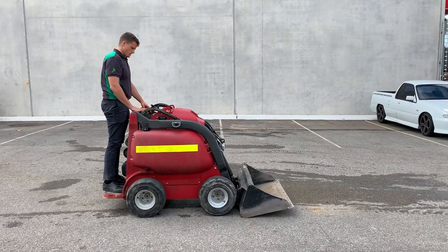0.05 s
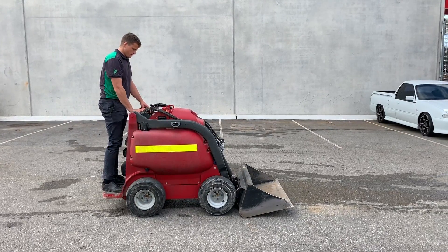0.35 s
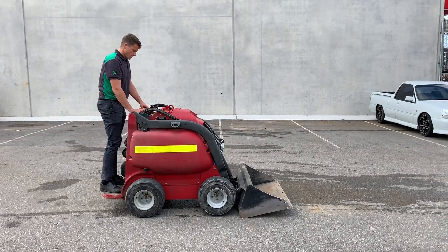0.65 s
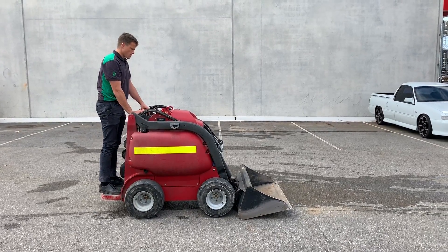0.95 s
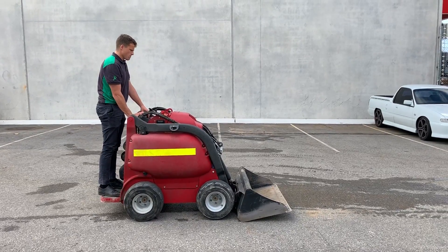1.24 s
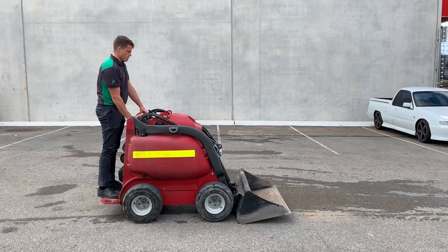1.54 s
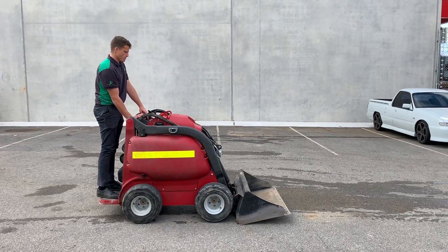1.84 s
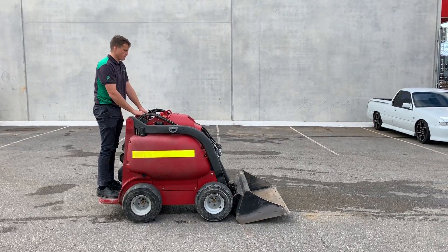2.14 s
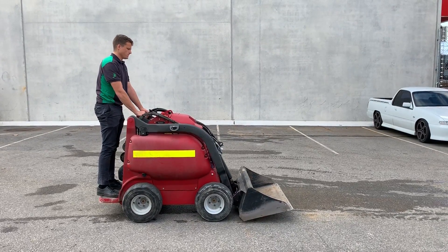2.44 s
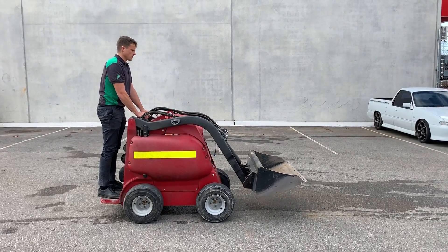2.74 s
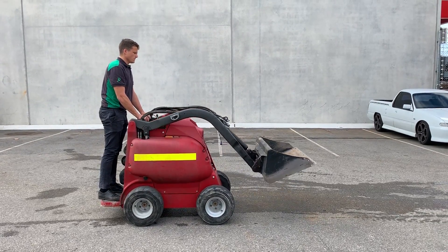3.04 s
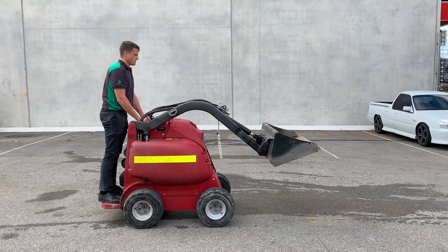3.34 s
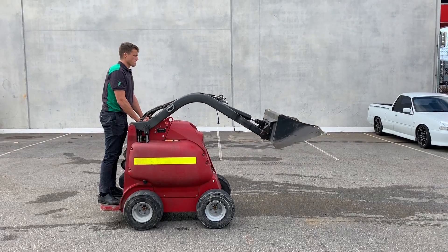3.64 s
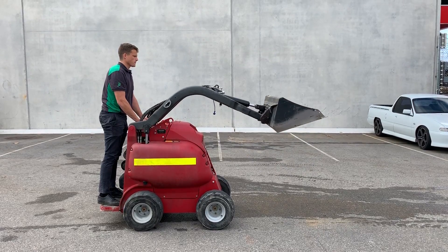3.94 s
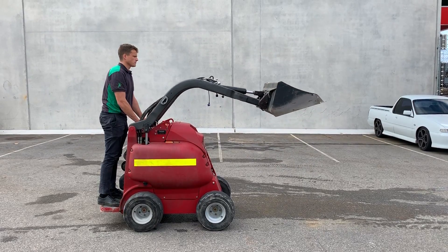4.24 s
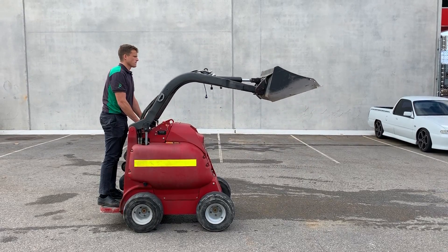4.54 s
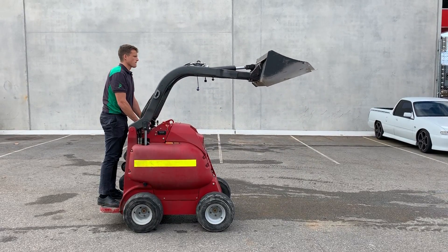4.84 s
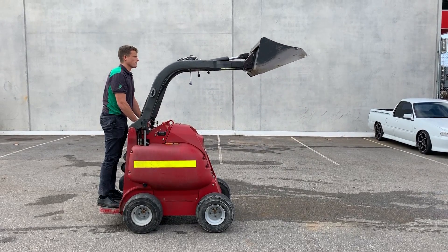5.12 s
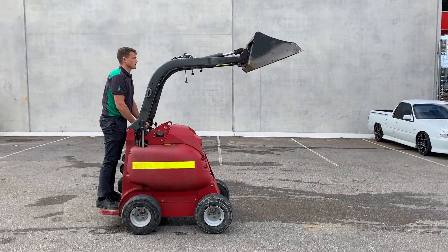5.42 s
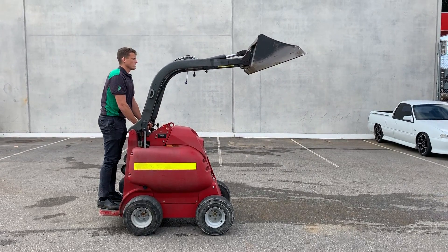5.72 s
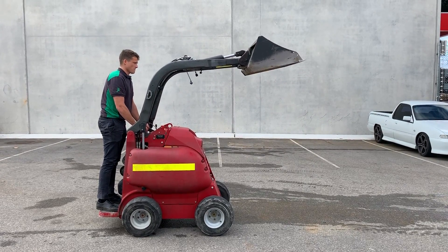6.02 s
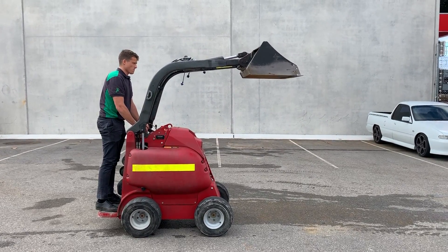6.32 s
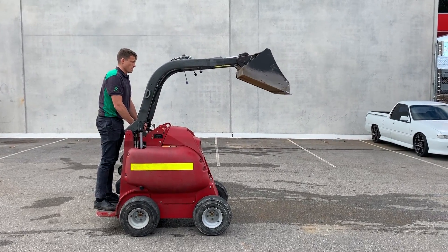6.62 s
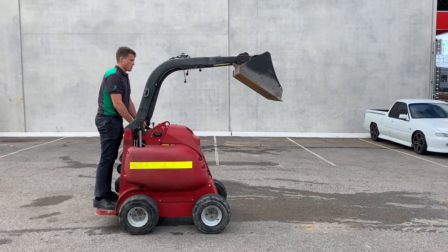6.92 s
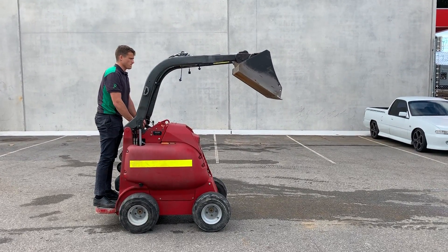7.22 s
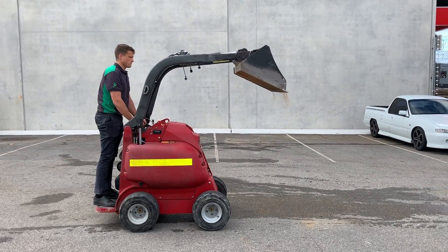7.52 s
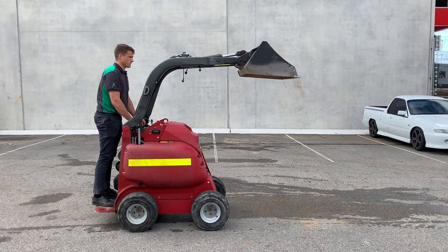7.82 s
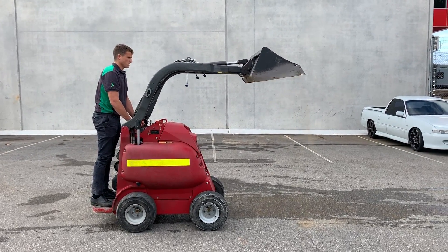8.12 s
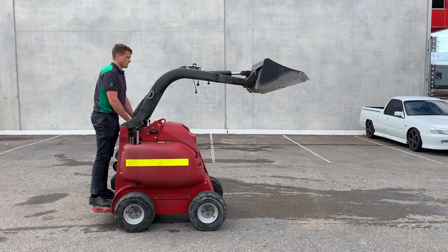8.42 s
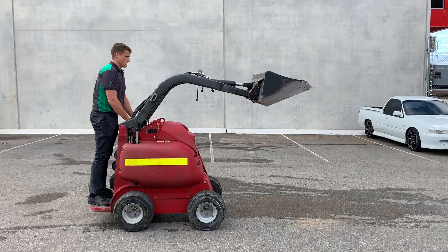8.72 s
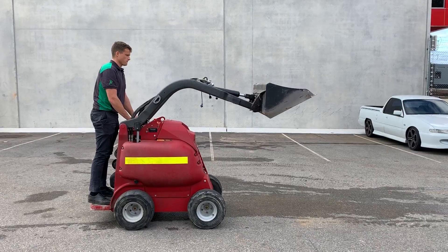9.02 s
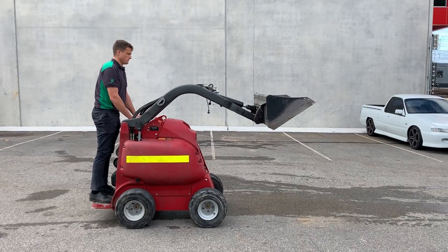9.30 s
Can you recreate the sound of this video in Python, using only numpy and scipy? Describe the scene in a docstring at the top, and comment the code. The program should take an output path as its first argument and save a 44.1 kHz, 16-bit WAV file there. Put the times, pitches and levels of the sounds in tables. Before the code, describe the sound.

A small diesel loader idles, revs up and runs steadily, with a faint hydraulic hum and thin hiss as its arm moves.

```python
"""A three-cylinder diesel mini loader idles in an open car park, its slack linkage clanking. At 0.5 s it is
throttled up and labours to its governed speed: the exhaust drones, the fan hums, each cycle thumps the
chassis and rattles a panel, injectors and valves clatter. From 2.5 s the pump hums and oil hisses through
the control valve as the arm lifts; near 5.5 s it meets its stop and the engine labours again.
The bucket tips at 6 s and curls back, and from 7.6 s the arm sinks with a thin hiss."""
import sys
import numpy as np
from scipy import signal
from scipy.fft import rfft, irfft
from scipy.io import wavfile
from scipy.ndimage import uniform_filter1d

SR = 44100
rng = np.random.default_rng(int(sys.argv[2]) if len(sys.argv) > 2 else 0)


def waveform_to_disk(signal):
    """Save audio, clipped to [-1, 1], as 16-bit WAV at the path in sys.argv[1]."""
    frames = np.transpose(np.atleast_2d(signal))
    scaled = np.clip(frames, -1, 1) * 32767
    samples = np.round(scaled).astype(np.int16)
    wavfile.write(sys.argv[1], SR, samples)


N = 421596

WORKING_HZ, IDLE_SETTING_HZ, FULL_SETTING_HZ = 25, 10.9, 25.96  # four-stroke cycles per second
THROTTLE_S, HARSH_UNTIL_S, SETTLE_S = 0.51, 1.8, 2.8
DROOP_HZ, HALF_FUEL = 1.18, 0.56
LUG_HZ, LUG_RANGE_HZ = 1.27, .5  # the engine labours when pulled this far under its setting
# The rev curve: (t/s, cycle rate f/Hz)
REVS = [(0.0, 8.172), (0.19, 9.65), (0.56, 9.715), (1.03, 15.752), (1.76, 23.826), (2.15, 25.664),
        (2.4, 25.536), (2.63, 24.95), (2.88, 24.978), (5.49, 25.013), (5.7, 23.924), (5.98, 25.653),
        (6.35, 25.032), (7.16, 24.962), (7.43, 25.487), (7.8, 24.439), (8.83, 24.781), (9.56, 24.64)]

def crankshaft():
    """Cycle rate and engine state; the governor feeds more fuel the further speed lags its setting."""
    t = np.arange(N) / SR
    hz, = curves(REVS)
    setting_hz = np.where(t < THROTTLE_S, IDLE_SETTING_HZ, FULL_SETTING_HZ)
    short_hz = np.maximum(setting_hz - hz, 0)
    demand = np.tanh(short_hz / DROOP_HZ)
    lug = np.clip((short_hz - LUG_HZ) / LUG_RANGE_HZ, 0, 1)
    fuel, labour = uniform_filter1d([demand, lug], size=SR // 8)  # the fuel rack takes a moment
    harsh = np.exp(-np.maximum(t - HARSH_UNTIL_S, 0) / SETTLE_S)
    return hz, np.array([np.log2(hz / WORKING_HZ), fuel - HALF_FUEL, harsh, labour])


def ride(fader, state):
    """Ride a fader in dB: base level, then dB per octave of speed, unit of fuel, harshness and labour."""
    return fader[0] + np.dot(fader[1:], state)


WAVER_DB, RAGGED_DB = .4, 1.4  # wobble of the drone: always, and added while labouring
FRAME_ORDER = 10
# The arm's travel: (t/s, height 0-1)
ARM_HEIGHT = [(2.55, 0), (5.3, 0.8), (7.7, 1), (9.56, 0.4)]
# Swells and dips that an order sweeps through: (f/Hz, width/Hz, level/dB)
STANDING_WAVES = [(70.6, 2.1, -8), (144.8, 5.5, 4), (186.3, 6.4, 13), (682, 11, 8)]
# Drone partials: (order, level/dB, then dB per unit of each: octave of speed, fuel, harshness,
# labour, oil pressure, arm height)
DRONE_ORDERS = [(3, -19, 17, -2.5, 4.5, 1, -1, 0), (6, -18.5, 4.5, 5.5, 2.5, 2, 0.5, -0.5),
                (7, -35.5, 18, 21, -2, -2.5, -11, -8), (8, -40.5, 6, -7.5, 21.5, 4, -14.5, 16.5),
                (9, -25.5, 2, -8, -2, 8, -13, 3.5), (10, -23, 23, 4.5, 7, -4.5, 2, 4.5),
                (12, -41.5, -13, -7.5, 1, 1, 8, -4), (28, -41, 10, 6, -7, -3, 1, 1)]

def exhaust(cycles, hz, state, pressure, frame_db):
    """The exhaust drones on harmonics of the engine cycle, turning ragged as the engine labours."""
    height, = curves(ARM_HEIGHT)
    controls = np.vstack([state, pressure, height])
    wobble_db = WAVER_DB + RAGGED_DB * state[-1]
    since_thump = cycles - THUMPS[0][0]
    drone = 0
    for order, *fader in DRONE_ORDERS:
        swell_db = sum(db * np.exp(-((order * hz - centre) / width) ** 2)
                       for centre, width, db in STANDING_WAVES)
        level_db = ride(fader, controls) + swell_db + frame_db * (order == FRAME_ORDER)
        drone += undb(level_db + wobble_db * walk(20)) * np.cos(2 * np.pi * order * since_thump)
    return drone


# Blows on the chassis: (place in the cycle 0-1, relative level/dB)
THUMPS = [(.6, -5.5), (.2, -9)]
# Hollow tones of chassis and muffler: (f/Hz, width/Hz, relative level/dB)
CHASSIS_MODES = [(115, 15, -17), (183, 24.7, 0.5), (216, 40, -4), (263.5, 19.3, 4.5), (298, 7.3, -2.5),
                 (346, 20, -5.5), (406, 66, -11.5)]
# The muffler's dark tone: (f/Hz, level/dB)
MUFFLER_EQ = [(50, -16), (110, -2), (160, -2), (350, -1), (430, -9.5), (550, -19.5), (1200, -60)]
# Slow, soft firings hardly reach the upper modes: (f/Hz, level/dB)
SOFT_FIRING_EQ = [(290, 0.5), (350, -12), (450, -6)]

def chassis(cycles, hz):
    """Uneven firings boom in the hollow frame, later in the cycle at speed; gas puffs after each."""
    pace = hz / hz.max()
    shifted = cycles + .55 * (.975 - pace)
    blows = sum(undb(db) * strikes(shifted, place, scatter_db=1.7, slop=0.0018) for place, db in THUMPS)
    puff = scrape(blows, seconds=0.007)
    push = steady(blows) + undb(2.8) * steady(puff) + undb(-3) * pace * noise()
    boom = colour(body(push, CHASSIS_MODES), MUFFLER_EQ)
    return steady(pace ** 2 * boom + (1 - pace ** 2) * colour(boom, SOFT_FIRING_EQ))


FAN_ORDER, FAN_FADER = 13.085, (-23, 7, 0, 7.5, -3)

def fan(cycles, state):
    """The cooling fan's blades chop the air into a gently wavering hum."""
    return undb(ride(FAN_FADER, state) + .5 * walk(12)) * np.sin(2 * np.pi * FAN_ORDER * cycles)


WHINE_ORDERS = (31, 34)
# The rattle's rhythm: (place in the cycle 0-1, relative level/dB)
RATTLES = [(.46, 1), (.655, -4.5), (.23, -4.5), (0.97, -16)]
# The panel's ring: (f/Hz, width/Hz, relative level/dB)
PANEL_MODES = [(700, 19, -20), (788, 42, 5), (809, 17, 5), (966, 120, -17)]

def panel(cycles):
    """A loose steel panel chatters every cycle and sings when a gear order meets one of its modes."""
    blows = sum(undb(db) * strikes(cycles, place, scatter_db=-1.4, slop=0.0016) for place, db in RATTLES)
    lower, upper = (np.cos(2 * np.pi * order * (cycles - RATTLES[0][0])) for order in WHINE_ORDERS)
    gears = undb(-28.5) * lower + undb(-21.5) * upper
    contact = 1 + np.cos(2 * np.pi * (cycles - .52))  # the gears reach the panel only while it touches
    whine = gears * contact * undb(0.75 * walk(9.2))
    buzz = undb(-5.5) * steady(scrape(blows, seconds=0.0041))
    ringing = body(steady(blows) + whine + buzz, PANEL_MODES)
    return steady(ring(ring(ringing, hz=884, width=450), hz=770, width=800))


# Injector and valve ticks: (place in the cycle 0-1, f/Hz, width/Hz, relative level/dB)
KNOCKS = [(.04, 2057, 130, 1), (0.078, 1015, 150, -4.5), (.32, 2090, 263, -3), (.5, 1836, 90, 0.5),
          (0.631, 2070, 200, -2.5), (0.748, 1117, 89, -1.5), (.86, 2600, 420, -1.5), (0.871, 1454, 159, -8),
          (0.198, 2720, 500, -3.5)]
# The block's metallic tone: (f/Hz, level/dB)
BLOCK_EQ = [(250, -22), (400, 4.5), (520, -1), (720, 4.5), (980, 8), (1150, 3.5), (1450, -1), (2050, 2),
            (2700, -6.5), (3150, -16.5), (4300, -17.5), (8000, -28)]
# How that tone shifts at a slow idle: (f/Hz, level/dB)
IDLE_KNOCK_EQ = [(400, 3), (600, 2), (850, -2.5), (1100, -11), (1400, -6), (1850, -0.5), (2800, -1)]

def clatter(cycles):
    """Each knock rings its own part of the head and shakes the block; gears grind on in between."""
    rings, blows = 0, 0
    for place, hz, width, db in KNOCKS:
        knock = undb(db) * strikes(cycles, place, scatter_db=2.9, slop=0.001)
        push = knock + undb(-18) * scrape(knock, seconds=0.0056)
        rings += ring(ring(push, hz, width), hz, 3 * width) / np.sqrt(width)
        blows += knock
    block = colour(steady(scrape(blows, seconds=0.004)) + undb(4.5) * noise(), BLOCK_EQ)
    pace = np.gradient(cycles) * SR / WORKING_HZ
    block = pace ** 2 * block + (1 - pace ** 2) * colour(block, IDLE_KNOCK_EQ)
    grind_db = 5 * np.log2(pace)  # at idle the knocks stand clear; at speed the gears fill the gaps
    return steady(undb(grind_db) * steady(block) + undb(-8.5) * steady(rings))


# Linkage hits at low revs: (t/s, relative level/dB, f/Hz)
CLANKS = [(0.1391, -26, 2000), (0.2349, -22, 2230), (0.3334, -25.5, 1060), (0.4354, -22, 1050),
          (0.5444, -21.5, 1040), (0.5781, -22.5, 1800), (0.817, -24, 2160)]

def clanks():
    """The slow engine shakes the arm, and its slack pins knock in their bores."""
    track = np.zeros(N)
    t = np.arange(SR // 8) / SR
    envelope = np.exp(-t / 0.017) * (1 - np.exp(-t / 0.00077))
    for start_s, db, hz in CLANKS:
        metal = ring(ring(rng.standard_normal(len(t)), hz, 0.31 * hz), hz, .6 * hz)
        start = int(start_s * SR)
        track[start:start + len(t)] += undb(db - 2.5) * metal / metal.std() * envelope
    return track


VALVE_S = .05  # time to open or close
# Cues for the arm's lift, the bucket's tip and curl, the arm's descent: (start t/s, end t/s,
# oil pressure 0-1, pump level/dB, hiss level/dB, chassis boom change/dB, frame hum change/dB)
MOVES = [(2.476, 2.605, 0.6, -35, -47, -1, 4.5), (2.582, 5.46, 0.9, -35.5, -52, -1.5, 0),
         (5.443, 5.78, 0.16, -39, -46, 2, -2.5), (5.98, 6.45, 0.17, -36, -47, 1, 1),
         (6.46, 6.904, 0.26, -37.5, -46.5, 0, -5.5), (6.914, 7.056, 0.7, -36.5, -39, 0.5, -2.5),
         (7.22, 7.63, 0.2, -38.5, -50, 0, -0.5), (7.615, 8.603, 0.05, -50, -42.5, -0.5, 2.5),
         (8.6, 9.8, 0.06, -50, -43, -2.5, -2)]

def control_valve():
    """Each move opens the valve: oil pressure, pump and hiss gains, dB changes of boom and frame hum."""
    t = np.arange(N) / SR
    controls = 0
    for start, end, pressure, pump_db, oil_db, boom_db, frame_db in MOVES:
        opening = np.clip(np.minimum(t - start, end - t) / VALVE_S + .5, 0, 1)
        controls += np.outer([pressure, undb(pump_db), undb(oil_db), boom_db, frame_db], opening)
    return controls


PUMP_ORDER = 24

def pump(cycles):
    """The oil pump's gear teeth mesh in a wavering hum."""
    return undb(walk(11)) * np.sin(2 * np.pi * PUMP_ORDER * cycles)


# The oil's sizzle: (f/Hz, level/dB)
OIL_EQ = [(5000, -28), (9000, -38), (10800, 6.5), (12200, -4), (13100, 8), (14000, -7), (15000, 6),
          (16000, -15)]
# Whistles on top of it: (f/Hz, width/Hz, relative level/dB)
OIL_WHISTLES = [(5430, 150, -4), (8305, 80, -5), (11420, 70, 1), (11970, 70, -3), (12790, 60, 0),
                (15030, 150, -5)]

def oil():
    """Oil squeezes through the valve with a thin, high, whistling hiss."""
    whistle = steady(body(noise(), OIL_WHISTLES))
    hiss = steady(colour(noise(), OIL_EQ))
    return steady(hiss + undb(-3) * whistle) * undb(.6 * walk(30))


# A bright bed of air: (f/Hz, level/dB)
AIR_EQ = [(1500, -28), (3400, 8.5), (4500, -0.5), (6000, 3), (7300, 3.5), (7900, -0.5), (8600, 4),
          (10500, -4.5), (13000, -0.5), (15500, -16)]

def air(cycles):
    """Cooling air and intake rush, pulsing lightly with the crankshaft."""
    pulse_db = .8 * np.cos(4 * np.pi * (cycles - .3)) + .5 * walk(60)
    return steady(colour(noise() * undb(pulse_db), AIR_EQ))


RUMBLE_DB, ROCK_DB = -43, -36.5

def rumble(cycles):
    """The engine rocks on its mounts once a crank turn over a low, loose rumble."""
    low = colour(noise(), [(18, -30), (35, 3), (55, 9), (100, -7), (160, -12), (400, -54), (2000, -90)])
    pace = np.clip(np.gradient(cycles) * SR / WORKING_HZ, 0, 1)
    rocking = pace ** 2 * np.sin(4 * np.pi * cycles)
    return undb(RUMBLE_DB) * steady(low) + undb(ROCK_DB) * rocking


# Stereo focus, tight in the bass: (f/Hz, likeness of left and right 0-1)
LIKENESS = [(330, .9995), (450, .98), (900, .96), (1400, .86), (3200, .85), (4400, .35), (6500, .3),
            (8000, .88), (15000, .88)]
# Pan across the spectrum: (f/Hz, left minus right level/dB)
PAN = [(120, -1.5), (260, -2), (450, 2), (750, 1.5), (1300, 4), (2200, -0.5), (3600, -0.7), (4400, -3),
       (6000, -6), (7400, 1.5), (9000, -0.7)]
# Phase between the sides: (f/Hz, left lead/rad)
PHASE_LEAD = [(0, 0), (2240, 0.24), (3530, 3.9), (3960, 2.24), (4740, 5.6), (5250, 3.56), (7320, 7.8),
              (7920, 6.2), (9300, 3.4), (10200, 2.9), (11100, 0), (11900, -0.2), (14600, -5.5),
              (16600, -6.8)]

def car_park(machine, hiss, stray_hiss):
    """Direct sound reaches both sides; echoes off wall and asphalt and far vents' hiss widen it."""
    echoes = signal.fftconvolve(machine, tail(t60=0.23))[:N]
    alike = np.clip(across(LIKENESS), 0, 1)
    mid = rfft(machine + hiss) * np.sqrt((1 + alike) / 2)
    side = rfft(echoes + stray_hiss) * np.sqrt((1 - alike) / 2)
    lean = undb(across(PAN) / 2) * np.exp(.5j * across(PHASE_LEAD))
    return irfft(np.array([(mid + side) * lean, (mid - side) / lean]), N)


def tail(t60):
    """A dense reverb tail of unit energy."""
    t = np.arange(SR // 2) / SR
    response = rng.standard_normal(len(t)) * np.exp(-np.log(1000) * t / t60)
    return response / np.sqrt(np.sum(response ** 2))


def strikes(cycles, place, scatter_db, slop):
    """One click a cycle at the given place, each a little different in size and timing."""
    timing, strength = rng.standard_normal((300, 2)).T
    due = np.arange(len(timing)) + place + slop * timing
    when = np.interp(due, cycles, np.arange(N), right=N)
    inside = when < N - 1
    at, part = np.divmod(when[inside], 1)  # each click is shared between two samples
    at = at.astype(int)
    size = undb(scatter_db * strength[inside])
    return np.bincount(at, size * (1 - part), N) + np.bincount(at + 1, size * part, N)


def scrape(clicks, seconds):
    """Each click becomes a noise burst that swells and dies away."""
    pole = np.exp(-1 / (seconds * SR))
    return noise() * signal.lfilter([1 - pole], [1, -2 * pole, pole ** 2], clicks)


def ring(x, hz, width):
    """One resonance, gain 1 at its centre."""
    return signal.lfilter(*signal.iirpeak(hz, hz / width, fs=SR), x)


def body(x, modes):
    """A set of resonances struck together."""
    return sum(undb(db) * ring(x, hz, width) for hz, width, db in modes)


def colour(x, eq):
    """Filter by an (f/Hz, level/dB) curve."""
    return irfft(rfft(x) * undb(across(eq)), N)


def across(table):
    """An (f/Hz, value) table on the bins of the spectrum."""
    hz, value = np.transpose(table)
    return np.interp(np.log(np.arange(N // 2 + 1) * SR / N + 1), np.log(hz), value)


def curves(table):
    """Each column of a timed table, sample by sample."""
    times, *columns = np.transpose(table)
    return [np.interp(np.arange(N) / SR, times, column) for column in columns]


def steady(x):
    """Level the running rms to 1, leaving the beat within a cycle alone."""
    size = SR // 5
    return x / np.sqrt(uniform_filter1d(uniform_filter1d(x ** 2, size), size) + 1e-12)


def walk(rate):
    """Random levels held 1 / rate s and slewed twice; spread 1."""
    hold = int(SR / rate)
    steps = np.repeat(rng.standard_normal(N // hold + 1), hold)[:N]
    slow = uniform_filter1d(uniform_filter1d(steps, hold), hold)
    return slow / slow.std()


def noise():
    """White noise."""
    return rng.standard_normal(N)


def undb(db):
    """Decibels to gain."""
    return 10 ** (np.asarray(db) / 20)


THUMP_FADER, PANEL_FADER = (-23.5, 5, -0.5, 7, 2), (-26.5, 13, -5, 5, 2)
CLATTER_FADER, AIR_FADER = (-28, 8, 1.5, 5.5, 0), (-41.5, 8, 0.5, 4, 2.5)
BYPASS_FADER = (-66, 10, 2, 6, 3)  # oil returning to the tank past the closed valve

def scene():
    """The mix: one crankshaft sets the rhythm; engine state and hydraulic moves ride the levels."""
    hz, state = crankshaft()
    cycles = np.cumsum(hz) / SR
    pressure, pump_gain, oil_gain, boom_db, frame_db = control_valve()
    boom = undb(ride(THUMP_FADER, state) + boom_db) * chassis(cycles, hz)
    drone = exhaust(cycles, hz, state, pressure, frame_db)
    engine = boom + drone + fan(cycles, state) + pump_gain * pump(cycles) + rumble(cycles)
    rattle = undb(ride(PANEL_FADER, state)) * panel(cycles)
    metal = rattle + undb(ride(CLATTER_FADER, state)) * clatter(cycles) + clanks()
    air_gain = undb(ride(AIR_FADER, state))
    oil_gain = np.hypot(oil_gain, undb(ride(BYPASS_FADER, state)))
    hiss, stray_hiss = (air_gain * air(cycles) + oil_gain * oil() for _ in range(2))
    return car_park(engine + metal, hiss, stray_hiss)


TOP_HZ = 15700

def record(dry):
    """Round off the very highest peaks and cut the top."""
    rounded = dry / (1 + dry ** 8) ** (1 / 8)
    return signal.sosfilt(signal.ellip(10, .2, 80, TOP_HZ, fs=SR, output="sos"), rounded)


dry = scene()
out = record(dry)
waveform_to_disk(out)
```